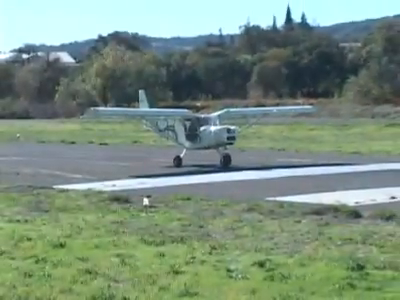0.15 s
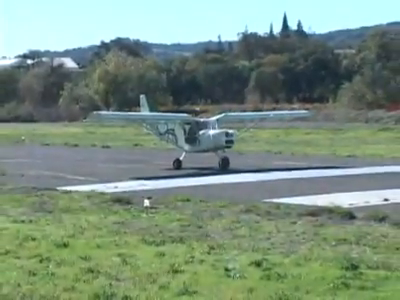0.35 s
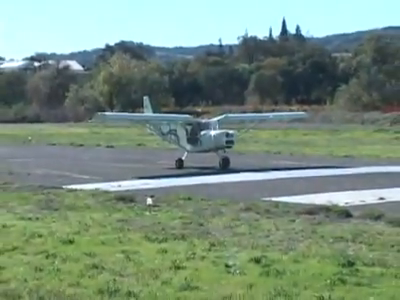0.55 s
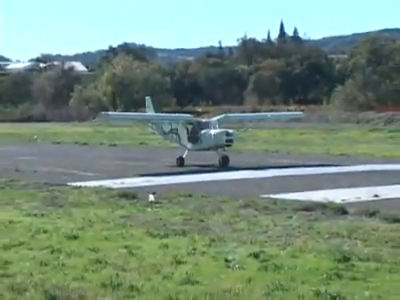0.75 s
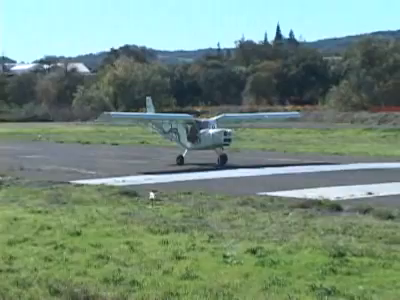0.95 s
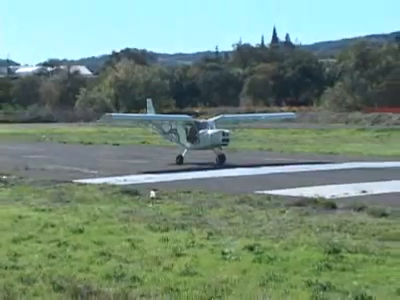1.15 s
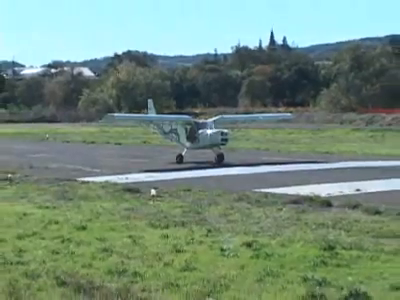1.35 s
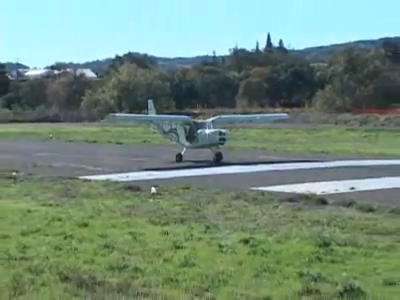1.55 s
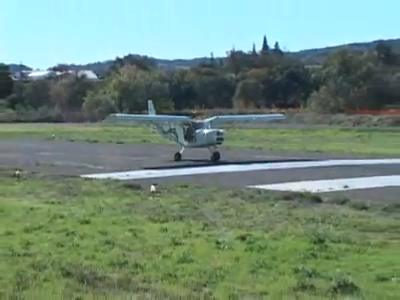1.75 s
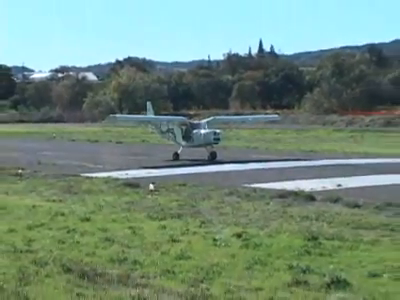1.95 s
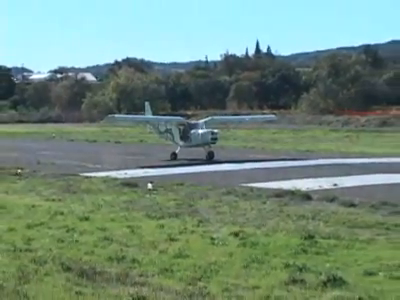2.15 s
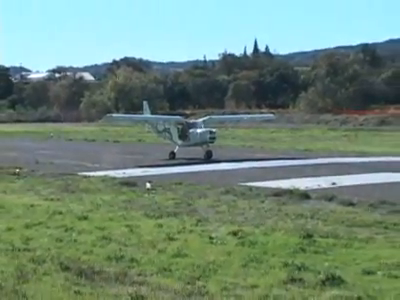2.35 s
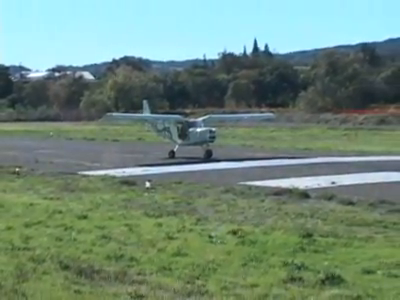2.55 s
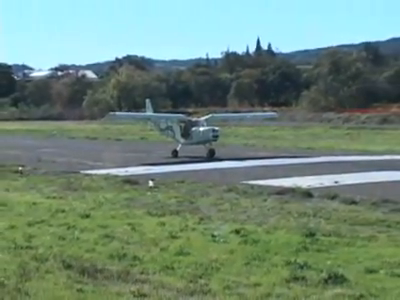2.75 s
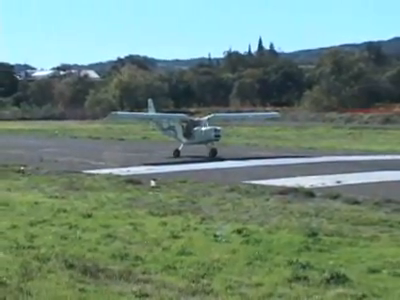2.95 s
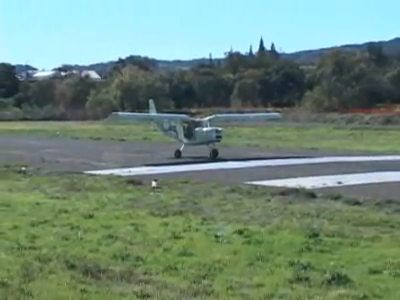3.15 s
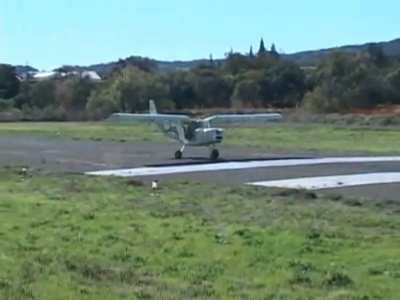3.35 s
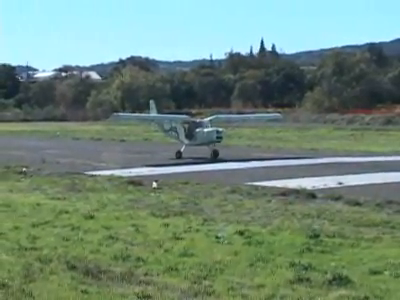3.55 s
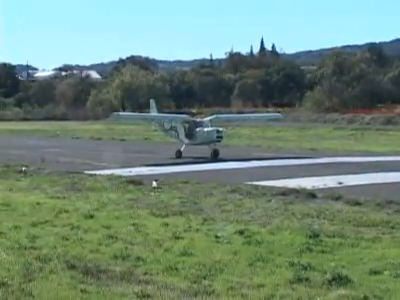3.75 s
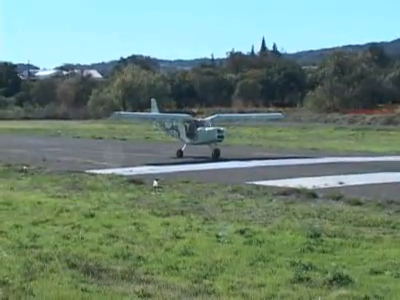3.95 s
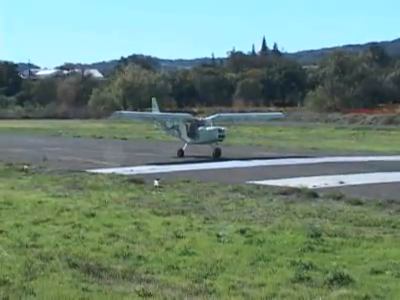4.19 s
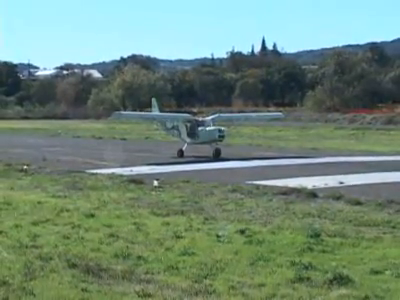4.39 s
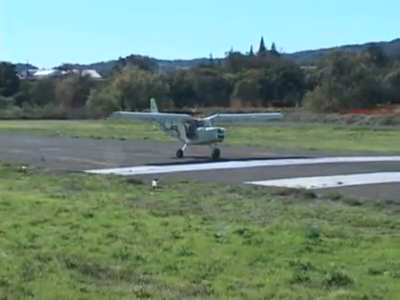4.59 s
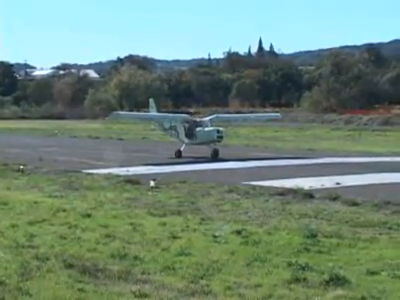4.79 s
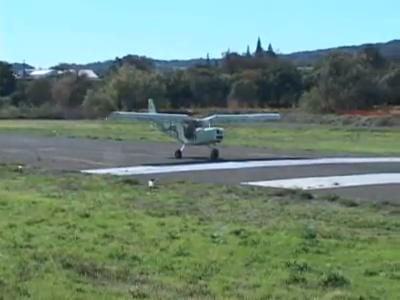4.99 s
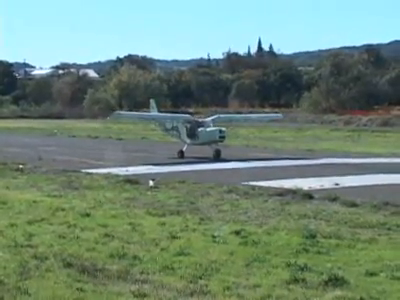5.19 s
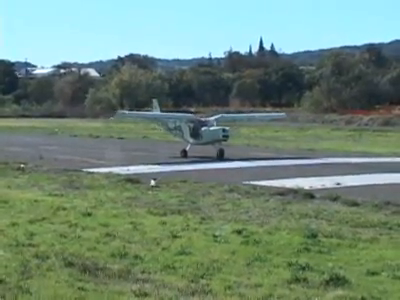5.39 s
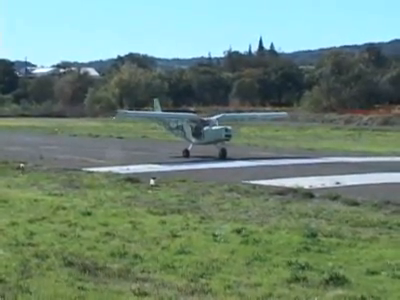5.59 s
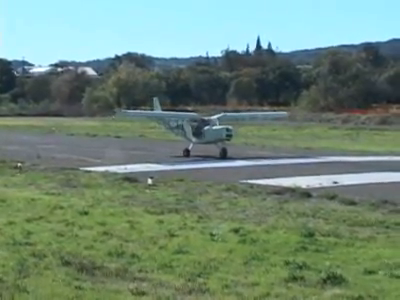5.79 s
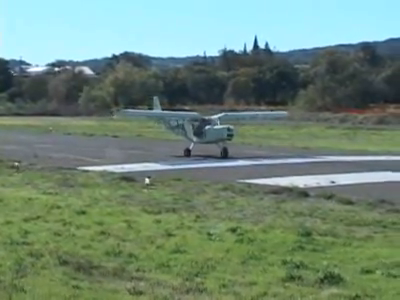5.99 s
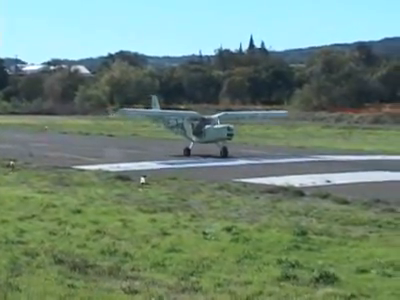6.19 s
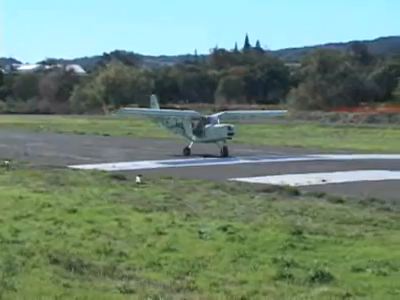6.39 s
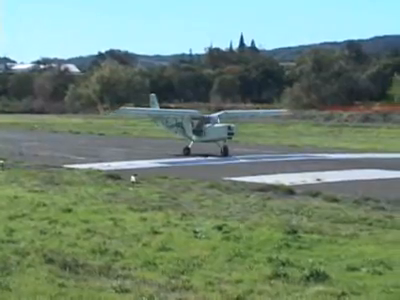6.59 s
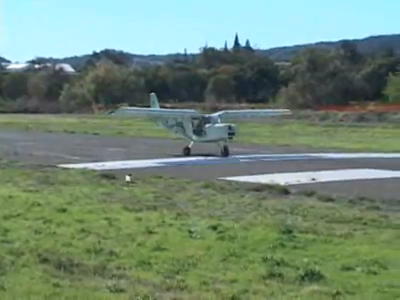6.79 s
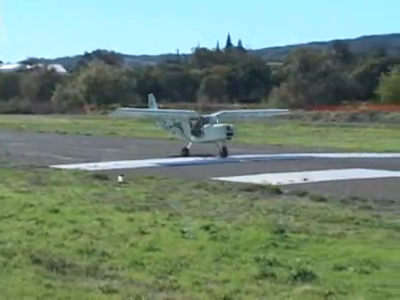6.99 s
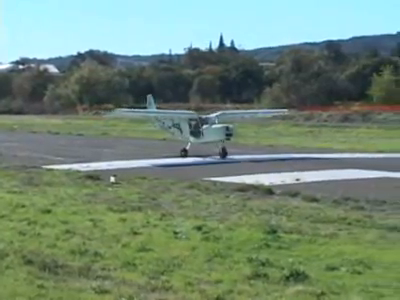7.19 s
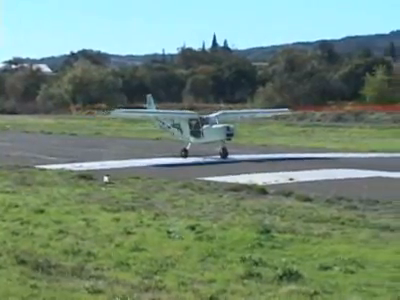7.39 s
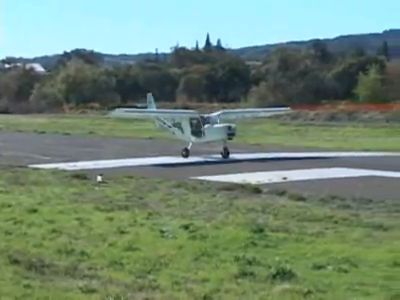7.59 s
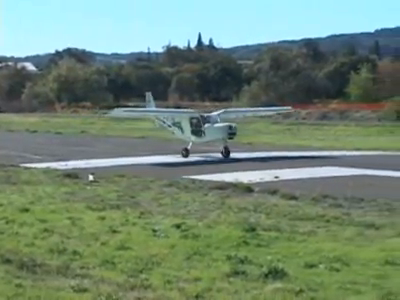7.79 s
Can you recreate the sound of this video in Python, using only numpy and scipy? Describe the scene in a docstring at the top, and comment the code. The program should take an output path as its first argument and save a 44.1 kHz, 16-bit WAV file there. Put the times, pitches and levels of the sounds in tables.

```python
"""A light aircraft on an airfield runway, some way from a small microphone with a breeze rumbling on it.
A four-cylinder engine drones at idle and turns a three-blade propeller through a whining reduction gear;
the air rushes as the blades first bite. At about four seconds the throttle opens: the blades stall and slap,
and churned air roars, rushes and hisses. The treble swells, then the beat deepens to thump and hum. Late on,
the loaded gearbox rings clean, and at the end rush and hiss brighten."""
import sys
import numpy as np
from scipy import signal
from scipy.fft import rfft, irfft, next_fast_len
from scipy.io import wavfile

SR = 44100
rng = np.random.default_rng(int(sys.argv[2]) if len(sys.argv) > 2 else 0)


def wrap_up_sound(samples):
    """Save the sound to the file named by the first command line argument, as 16-bit audio."""
    columns = np.atleast_2d(samples).T
    # keep every value between -1 and 1, then stretch to whole-number steps
    tamed = np.clip(columns, -1, 1)
    steps = np.round(tamed * 32767).astype(np.int16)
    wavfile.write(sys.argv[1], SR, steps)


N = 345744
TIME = np.arange(N) / SR  # seconds

PINION_TEETH, WHEEL_TEETH, BLADES = 21, 51, 3
IDLE_TURNS_PER_S = 18.77  # crankshaft
FULL_POWER_TURNS_PER_S = 40  # above this speed the engine's growth in level stops

# Each sound has a base level in dB at full power and a growth in dB per doubling of engine speed;
# the changes of load, stall, swell, beat, ring and brightening are added to these.
EXHAUST_DB, EXHAUST_GROWTH_DB = -28.5, 36
SLAP_DB, SLAP_GROWTH_DB = -50.5, 16
ROAR_DB, ROAR_GROWTH_DB = -29, 18
RUSH_DB, RUSH_GROWTH_DB = -32.5, 20
HISS_DB, HISS_GROWTH_DB = -55.5, 22
HUM_DB, HUM_GROWTH_DB = -46.5, 12
WHINE_DB, WHINE_GROWTH_DB = -48.5, 15
RING_DB, RING_GROWTH_DB = -58.5, 12

# Rush, hiss and whine start quieter until the blades take load; the body (roar and slap) takes longer.
UNLOADED_DB, WHINE_UNLOADED_DB, LOADING_S = -6, -16, 1.16
BODY_UNLOADED_DB, BODY_LOADING_S = -9.5, 1.92
SURGE_DB = 1.5  # rush as the blades first bite the air
STALL_SLAP_DB, STALL_ROAR_DB = 14.5, 2.5  # at high power on a standing plane the blades stall
SWELL_RUSH_DB, SWELL_HISS_DB = 5.5, 4.5  # treble as the power peaks
# As the speed settles, the blades' beat deepens: less crack, more thump and hum.
DEEPEN_S, DEEPEN_RISE_S = 5.6, 1
THUMP_DB, DEEP_THUMP_DB, DEEP_HUM_DB, DEEP_SLAP_DB = -0.5, 7, 6, -2
RING_S, RING_RISE_S, RING_LIFT_DB = 6.7, 0.45, 13.5  # late on, the loaded gearbox rings clean
BRIGHTEN_S, BRIGHTEN_DB_PER_S = 7.38, 8  # at the end rush and hiss brighten
BREEZE_DB = -38  # between lulls and gusts
MICROPHONE_TOP_HZ, TOP_HZ = 8000, 13300
CEILING = .365  # clipping level, full scale = 1


def undb(db):
    """Decibels to gain."""
    return 10 ** (np.asarray(db) / 20)


def unit(x):
    """Scale to rms 1."""
    return x / np.sqrt(np.mean(x ** 2))


def noise():
    """White noise."""
    return rng.standard_normal(N)


def walk(rate_hz):
    """Smooth chance with spread 1 that changes about rate_hz times a second."""
    bins = np.arange(N // 2 + 1) * SR / N
    return unit(irfft(rfft(noise()) / (1 + (bins / rate_hz) ** 4), N))


def ramp(start_s, rise_s):
    """From 0 to 1 in a straight line."""
    return np.clip((TIME - start_s) / rise_s, 0, 1)


def envelope(start_s, attack_s, hold_s, release_s):
    """From 0 to 1 and back in straight lines."""
    return ramp(start_s, attack_s) - ramp(start_s + attack_s + hold_s, release_s)


def colour(x, points):
    """Causal (minimum-phase) filter with the given (Hz, dB) outline; rms 1 out."""
    size = next_fast_len(N + 8192) // 2 * 2
    hz, db = np.transpose(points)
    bins = np.maximum(np.arange(size // 2 + 1) * SR / size, 1)
    outline_db = np.interp(np.log(bins), np.log(hz), db)
    # folding the cepstrum onto positive times makes the response causal
    cepstrum = irfft(np.log(undb(outline_db)))
    cepstrum[1:size // 2] *= 2
    cepstrum[size // 2 + 1:] = 0
    response = np.exp(rfft(cepstrum))
    return unit(irfft(rfft(x, size) * response)[:N])


def tones(turns, orders, waver_db):
    """Lines locked to a turning shaft, each wavering by waver_db in the moving air."""
    out = 0
    for multiple, db in orders:
        half_order = np.round(2 * multiple) / 2  # a four-stroke cycle takes two turns
        level = undb(db + waver_db * walk(0.9))
        out = out + level * np.sin(2 * np.pi * (half_order * turns + rng.random()))
    return np.sqrt(2) * out


# Pushes of the throttle.
# Each row: middle in seconds, ease in seconds, speed gained in crankshaft turns per second.
THROTTLE = [(1.61, .164, .79), (4.02, .757, 13.41), (4.57, .286, 9.52)]


def crank_speed():
    """Turns per second: the engine follows each push of the throttle along an S-curve."""
    gained = sum(gain / (1 + np.exp((middle_s - TIME) / ease_s)) for middle_s, ease_s, gain in THROTTLE)
    unsteady = 1 + .0006 * walk(5)
    return (IDLE_TURNS_PER_S + gained) * unsteady


# Drone of the exhaust heard across the field.
# Each row: multiple of the crankshaft speed, relative level in dB.
EXHAUST_ORDERS = [(1, -14.5), (2, 2), (2.5, -19.5), (3, -9), (3.5, -8), (4.5, -22), (6, -23.5), (9, -22.5),
                  (10, -15.5), (11, -13.5), (13.5, -18)]


def exhaust(turns, octaves):
    """Engine drone: lines at whole and half multiples of the crankshaft speed, steeply louder with speed."""
    return undb(EXHAUST_DB + EXHAUST_GROWTH_DB * octaves) * tones(turns, EXHAUST_ORDERS, waver_db=0.7)


def propeller_levels(octaves):
    """Decibels of roar, rush, hiss and slap: all follow speed and load, and the stall lifts the slap most."""
    surge = envelope(start_s=0.33, attack_s=0.63, hold_s=0.27, release_s=0.52)
    stall = envelope(start_s=4.422, attack_s=0.61, hold_s=1.62, release_s=0.75)
    swell = envelope(start_s=5.064, attack_s=0.4, hold_s=0.16, release_s=0.63)
    load_db = UNLOADED_DB * (1 - ramp(0, LOADING_S)) + SURGE_DB * surge
    body_db = BODY_UNLOADED_DB * (1 - ramp(0, BODY_LOADING_S))
    deeper_db = DEEP_SLAP_DB * ramp(DEEPEN_S, DEEPEN_RISE_S)
    brighter_db = BRIGHTEN_DB_PER_S * np.maximum(TIME - BRIGHTEN_S, 0)
    roar_db = ROAR_DB + ROAR_GROWTH_DB * octaves + STALL_ROAR_DB * stall + body_db
    rush_db = RUSH_DB + RUSH_GROWTH_DB * octaves + SWELL_RUSH_DB * swell + brighter_db + load_db
    hiss_db = HISS_DB + HISS_GROWTH_DB * octaves + SWELL_HISS_DB * swell + brighter_db + 0.85 * load_db
    slap_db = SLAP_DB + SLAP_GROWTH_DB * octaves + STALL_SLAP_DB * stall + deeper_db + body_db
    return roar_db, rush_db, hiss_db, slap_db


# Spectrum of the blade slap as heard at the microphone.
# Each row: frequency in Hz, relative level in dB.
SLAP_COLOUR = [(150, -8), (210, -3.5), (260, -.5), (310, 0), (370, 0), (420, -1), (470, 1), (515, 1.5),
               (570, -7), (660, -3.5), (800, -10), (1100, -8.5), (1500, -15), (2000, -18)]


def blade_slap(passes, slap_db, thump_db, scatter_db):
    """A pressure pulse for each passing blade; gusty inflow makes every pulse differ."""
    blade_hz = np.gradient(passes) * SR
    hz, db = np.transpose(SLAP_COLOUR)
    pulse = 0
    for k in range(3, 40):  # harmonics of the blade rate
        harmonic_hz = k * blade_hz
        thump = np.exp(-.5 * ((harmonic_hz - 235) / 80) ** 2)
        level = undb(np.interp(harmonic_hz, hz, db) + thump_db * thump)
        # the crack trails the thump, and shifting paths over the ground put harmonics a little out of step
        late = .022 * k ** 2 + .6 * walk(.8)
        pulse = pulse + level * np.cos(2 * np.pi * k * passes - late)
    blade = np.round(passes).astype(int)
    scatter = scatter_db * rng.standard_normal(blade[-1] + 1)[blade]
    return np.sqrt(2) * pulse * undb(slap_db + scatter)


def gate(passes, depth_db, lag):
    """A swell once a cycle, lag cycles after its start; rms 1 out."""
    bump = (.5 + .5 * np.cos(2 * np.pi * (passes - lag))) ** 3
    return unit(undb(depth_db * bump))


# Spectra of the churned air at the microphone: low roar, middle rush, high hiss.
# Each row: frequency in Hz, relative level in dB.
ROAR_COLOUR = [(50, -27.5), (110, 1), (160, -2), (220, -5.5), (310, -0.5), (450, 3.5), (600, -2),
               (740, -4.5), (1000, -19), (1800, -65), (8000, -87.5)]
RUSH_COLOUR = [(400, -14.5), (700, -6), (900, -1), (1100, 0), (1350, -2), (1600, -6), (2150, -5),
               (2750, -14), (3200, -13), (3600, -30.5), (4500, -62), (8000, -86.5)]
HISS_COLOUR = [(2500, -21), (3500, 7), (4250, 1), (5200, 1), (6000, 3), (6600, -2), (7000, -9.5),
               (7600, -21), (8400, -38.5)]


def propeller(passes, firings, octaves):
    """Blade slaps over churned air; roar and rush swell with each blade, the hiss also with each firing."""
    roar_db, rush_db, hiss_db, slap_db = propeller_levels(octaves)
    thump_db = THUMP_DB + DEEP_THUMP_DB * ramp(DEEPEN_S, DEEPEN_RISE_S)
    slap = blade_slap(passes, slap_db, thump_db, scatter_db=1.8)
    # the more the slap stands out, the deeper the air is chopped
    beat = np.clip(undb(slap_db - roar_db + 9), .35, .75)
    roar_air = noise() * gate(passes, 6 * beat, lag=0.069) * undb(1.0 * walk(60))
    rush_air = noise() * gate(passes, 6 * beat, lag=0.11) * undb(0.59 * walk(98))
    hiss_air = noise() * gate(passes, 3 * beat, lag=0.32) * undb(.5 * walk(25))
    hiss_air = hiss_air * gate(firings, 1.9, lag=0.27)
    # a deeper beat leaves less steady roar
    roar = undb(roar_db) * np.sqrt(1 - beat ** 2) * colour(roar_air, ROAR_COLOUR)
    rush = undb(rush_db) * colour(rush_air, RUSH_COLOUR)
    hiss = undb(hiss_db) * colour(hiss_air, HISS_COLOUR)
    return slap + roar + rush + hiss


# Propeller hum, strongly wavering across the field.
# Each row: multiple of the blade rate, relative level in dB.
HUM_ORDERS = [(1, 3), (2, -0.5)]


def propeller_hum(passes, octaves):
    """Low lines at multiples of the blade rate, stronger once the beat deepens."""
    hum_db = HUM_DB + HUM_GROWTH_DB * octaves + DEEP_HUM_DB * ramp(DEEPEN_S, DEEPEN_RISE_S)
    return undb(hum_db) * tones(passes, HUM_ORDERS, waver_db=4.5)


# Whine of the meshing gear teeth. Each row: multiple of the tooth mesh rate, relative level in dB.
GEAR_ORDERS = [(2, -2), (3, 1.5), (4, 0), (5, -4), (6, -3)]
# Ringing of the loaded gearbox. Each row: multiple of the crankshaft speed, relative level in dB.
LOADED_ORDERS = [(22, 2.5), (31.5, -3), (42, 0)]
# Resonances of the gearbox casing. Each row: frequency in Hz, relative level in dB.
GEARBOX_COLOUR = [(400, -12), (950, -3), (1400, -3), (1620, -9), (1850, 1), (2080, 1), (2350, -7),
                  (2750, -10), (3100, -22), (8000, -80)]
# Critical speeds of the drive, where the gears chatter.
# Each row: crankshaft turns per second, width in turns per second, rise in dB.
CRITICAL_SPEEDS = [(23, 2.2, 7.5), (30.8, 2.6, 3)]


def gear_whine(speed, turns, octaves, spread_hz):
    """Teeth meet unevenly: each mesh multiple is a narrow band gliding through the casing's resonances."""
    chatter_db = sum(db * np.exp(-((speed - centre) / width) ** 2) for centre, width, db in CRITICAL_SPEEDS)
    unloaded_db = WHINE_UNLOADED_DB * (1 - ramp(0, LOADING_S))
    rough_db = WHINE_DB + WHINE_GROWTH_DB * octaves + chatter_db + unloaded_db
    clean_db = RING_DB + RING_GROWTH_DB * octaves + RING_LIFT_DB * ramp(RING_S, RING_RISE_S)
    teeth = 0
    for multiple, db in GEAR_ORDERS:
        angle = 2 * np.pi * multiple * PINION_TEETH * turns
        band = walk(spread_hz) * np.sin(angle) + walk(spread_hz) * np.cos(angle)
        teeth = teeth + undb(db) * band
    # under full load the teeth stay pressed together and a few lines turn clean
    loaded = tones(turns, LOADED_ORDERS, waver_db=0.0)
    return undb(rough_db) * colour(teeth, GEARBOX_COLOUR) + undb(clean_db) * loaded


# Lulls and gusts at the microphone. Each row: start in seconds, attack in seconds, hold in seconds,
# release in seconds, change in dB.
GUSTS = [(.45, 0.24, 0.25, 0.038, -1.5), (1.95, .6, 0.29, 0.42, 2), (3.01, 0.22, 0.083, .05, -3),
         (3.4, 0.95, 1.2, .8, 5.5)]
# Spectrum of the wind rumble on the microphone. Each row: frequency in Hz, relative level in dB.
WIND_COLOUR = [(10, -26.5), (20, -2.5), (32, -2.5), (60, -1), (100, -5.5), (140, -10), (200, -19.5),
               (280, -21), (400, -27), (1000, -67)]


def breeze():
    """Low buffeting of the air at the microphone."""
    gust_db = sum(db * envelope(*shape) for *shape, db in GUSTS)
    buffets = undb(1.1 * walk(6))
    return undb(BREEZE_DB + gust_db) * colour(noise() * buffets, WIND_COLOUR)


def scene():
    """The crankshaft times the machine: two firings a turn, the gear mesh and the slower blades."""
    speed = crank_speed()
    turns = np.cumsum(speed) / SR
    octaves = np.minimum(np.log2(speed / FULL_POWER_TURNS_PER_S), 0)  # 0 at full power, negative below
    passes = turns * BLADES * PINION_TEETH / WHEEL_TEETH
    firings = 2 * turns
    engine = exhaust(turns, octaves)
    blades = propeller(passes, firings, octaves) + propeller_hum(passes, octaves)
    whine = gear_whine(speed, turns, octaves, spread_hz=50)
    return (engine + blades + whine + breeze())[None]


# Resonances of the microphone housing. Each row: frequency in Hz, width in Hz, peak in dB.
HOUSING = [(3030, 71, 3.5), (3940, 150, 9), (4786, 130, 11.5), (5524, 193, 8.5)]


def record(dry):
    """The housing rings in the treble, the microphone loses the top, and the tallest slaps just clip."""
    for hz, width_hz, db in HOUSING:
        ringing = signal.lfilter(*signal.iirpeak(hz, hz / width_hz, fs=SR), dry)
        dry = dry + (undb(db) - 1) * ringing
    dull = signal.sosfilt(signal.ellip(8, .2, 70, MICROPHONE_TOP_HZ, fs=SR, output="sos"), dry)
    clipped = np.clip(dull, -CEILING, CEILING)
    # a second low-pass trims the harmonics that clipping adds
    return signal.sosfilt(signal.ellip(8, .2, 70, TOP_HZ, fs=SR, output="sos"), clipped)


dry = scene()
out = record(dry)
wrap_up_sound(out)
```